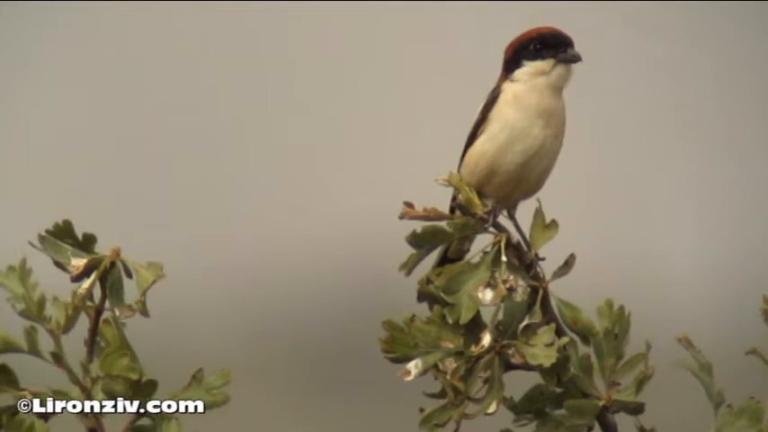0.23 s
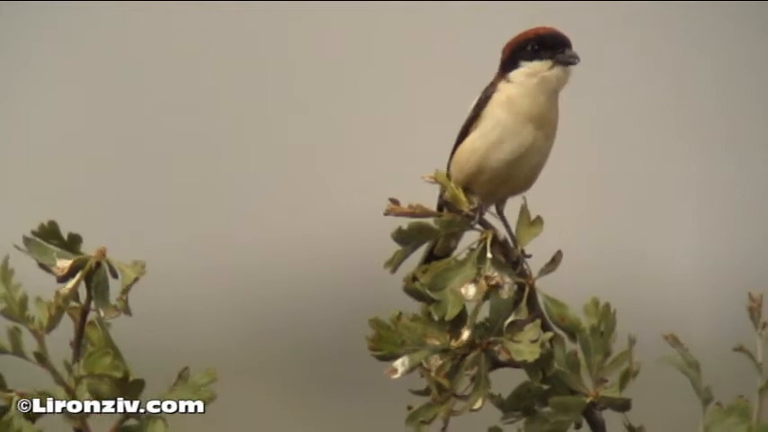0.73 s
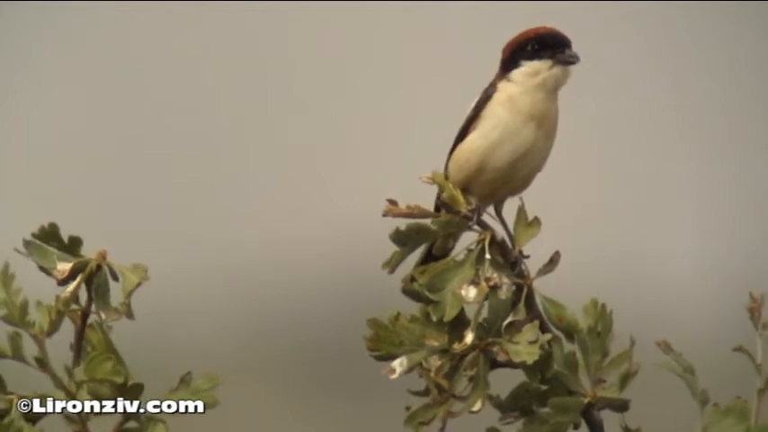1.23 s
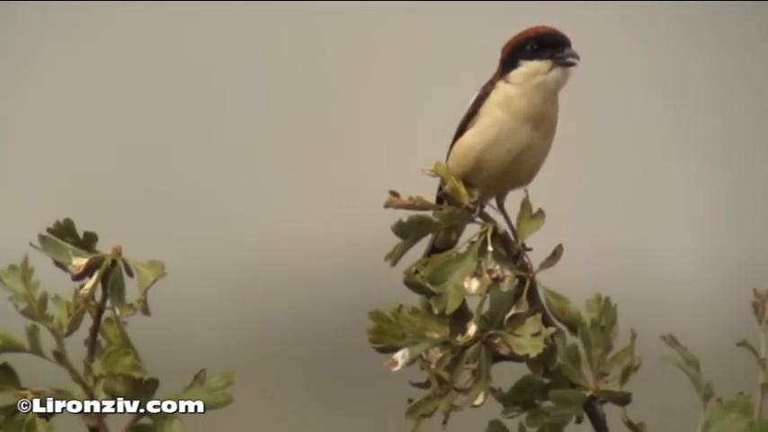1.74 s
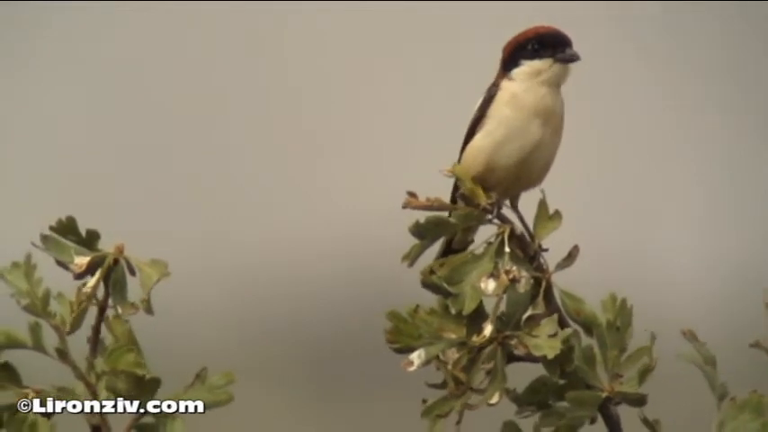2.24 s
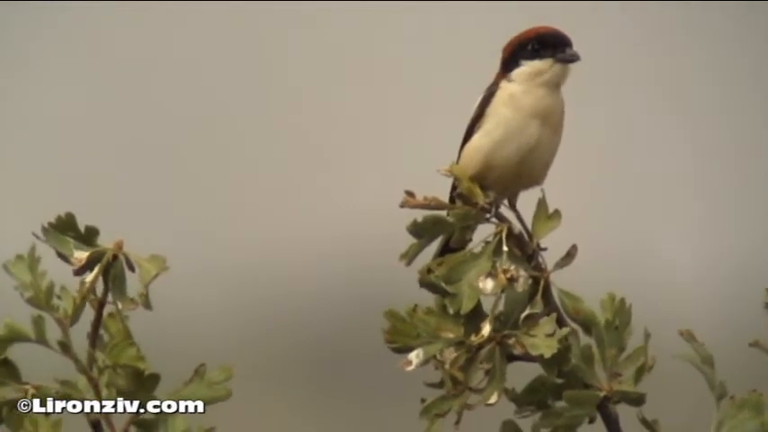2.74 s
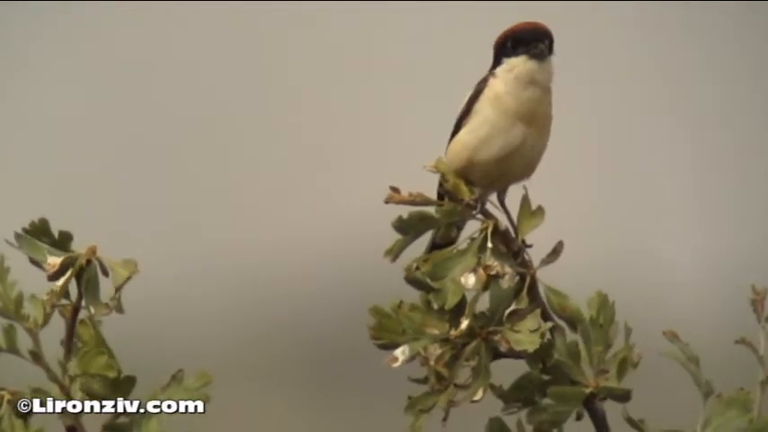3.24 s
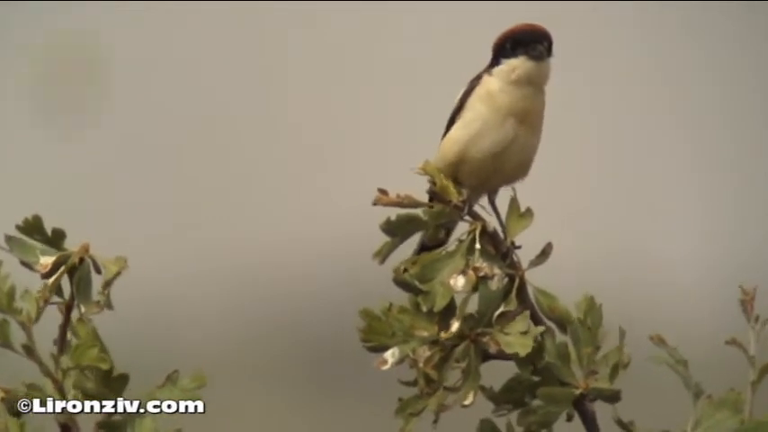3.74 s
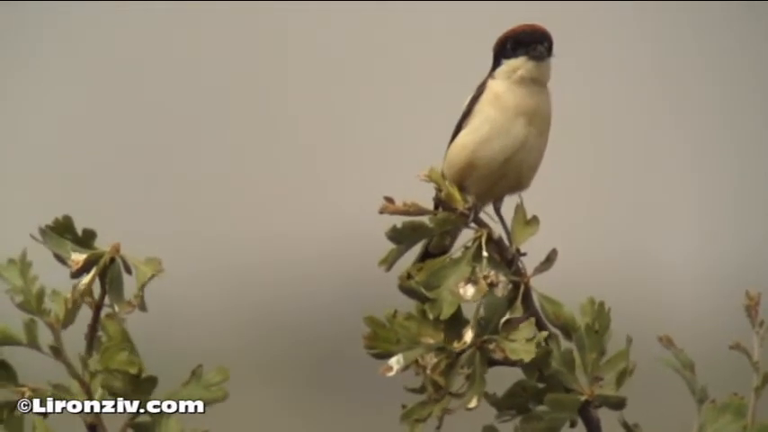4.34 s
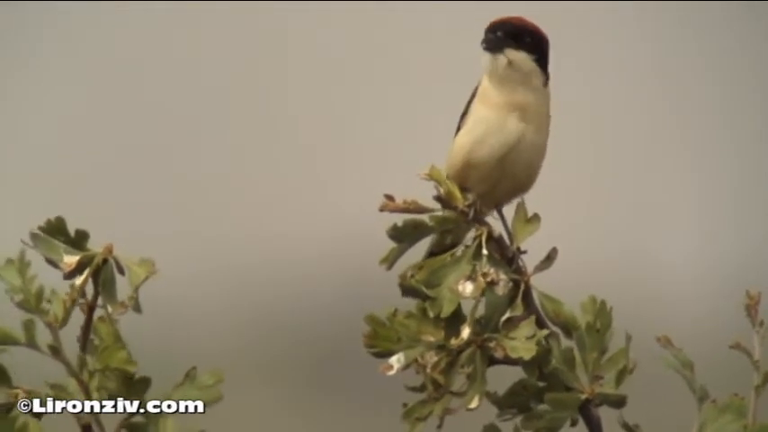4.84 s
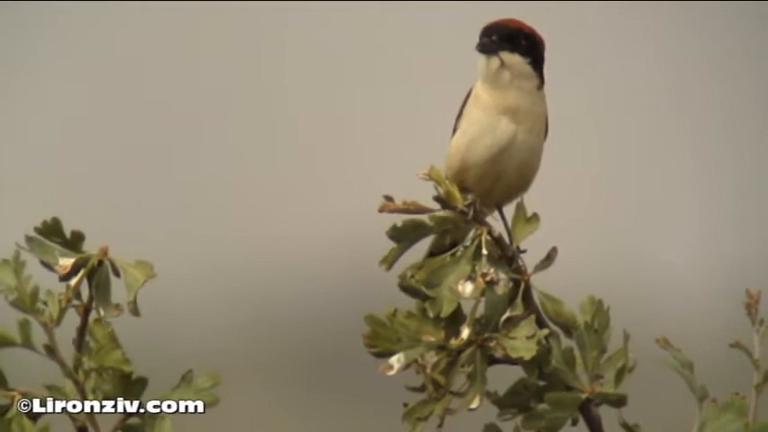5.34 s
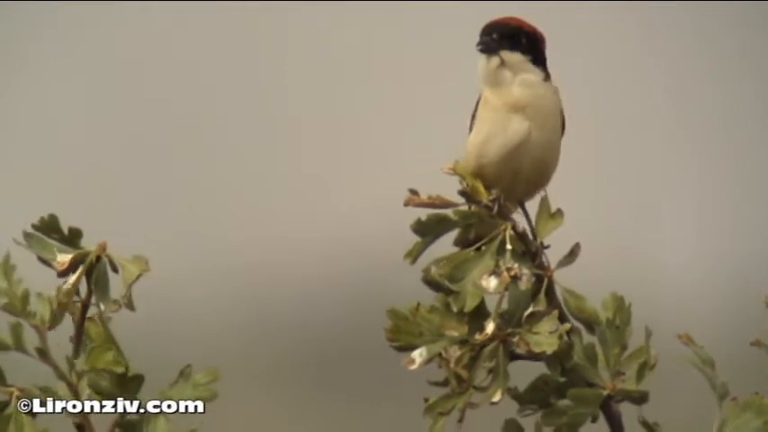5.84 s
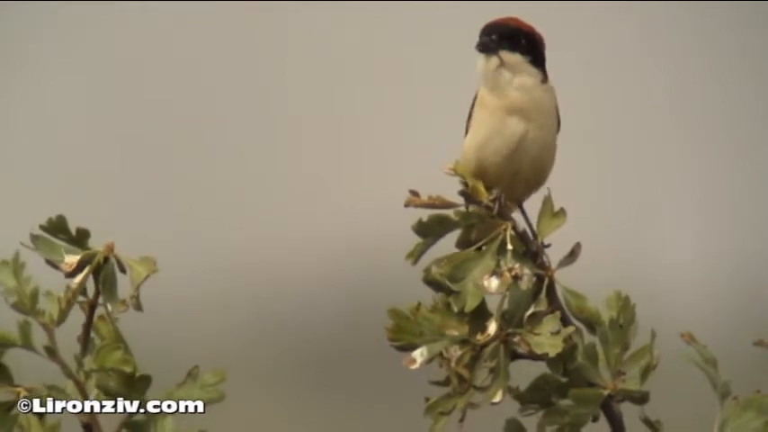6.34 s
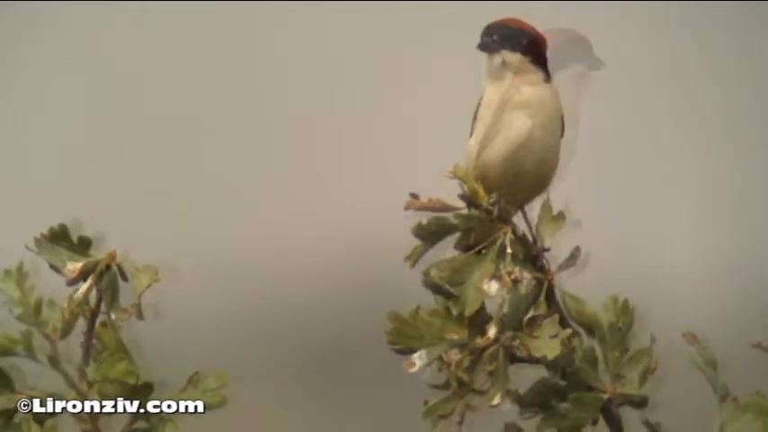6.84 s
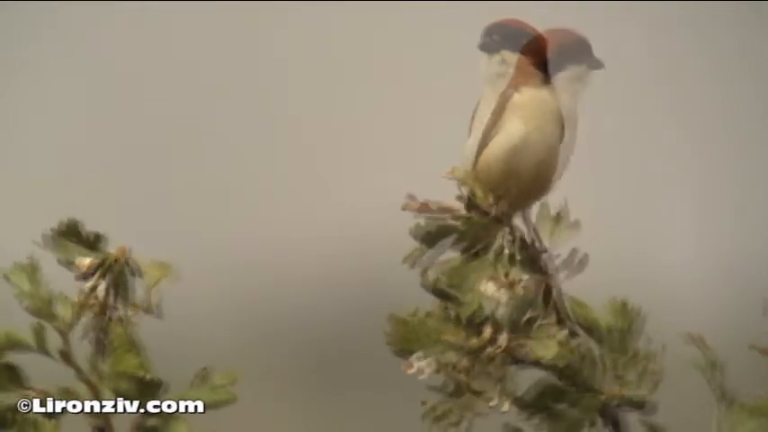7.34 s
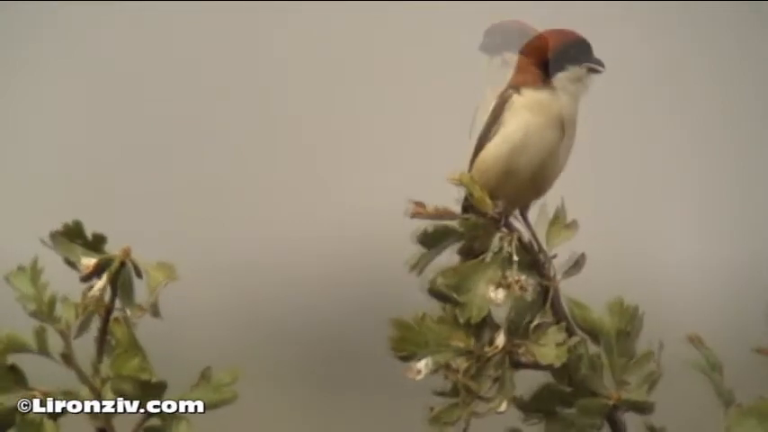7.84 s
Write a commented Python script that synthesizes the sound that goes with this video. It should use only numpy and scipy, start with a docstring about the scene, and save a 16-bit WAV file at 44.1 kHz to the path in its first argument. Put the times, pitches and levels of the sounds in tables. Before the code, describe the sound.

After a tiny moment of silence, soft outdoor hiss and faint low rumble begin. A small bird gives a low scratch at 0.2 s, then bright buzzy chirps from 0.4 to 0.9, the loudest notes, each diving and snapping upward. From 1.1 to 2.1 it mutters dry, scratchy chatter mixed with quick whistles, while dull low thumps bump underneath. A gap follows, with a soft thump at 2.8. From 2.9 to 3.5 come squeaky, sliding whistles, one rasp and a tiny trill. The bird then rests; low thumps cluster at 3.7 to 4.5, strongest near 4.0. Sparse rasps and whistles return at 4.9 to 5.2, then short, mixed scratches and drooping whistles from 5.4 to 6.5. Faint trills follow from 6.75, growing into a dense, thin, buzzing run from 7.3 to the end at 8. The sound is close and open, with only slight leafy echo.

```python
"""Shrike song over moving air

A shrike on a bush top sings quick phrases: gliding whistles, nearly pure tones broken by buzzes as a slower
vibration modulates them, and low scratchy chatter, pulse harmonics filtered by a throat resonance.
The foliage scatters a faint echo. Low thumps (decaying pressure swings) and an uneven rumble of shaped
noise, perhaps air buffeting the microphone, come and go over a soft outdoor hiss."""
import sys
import numpy as np
from scipy import signal
from scipy.fft import rfft, irfft, next_fast_len
from scipy.io import wavfile
from scipy.ndimage import map_coordinates

SR = 44100
rng = np.random.default_rng(int(sys.argv[2]) if len(sys.argv) > 2 else 0)


def master_out(mix):
    """Clip the mix to full scale and print it as 16-bit PCM to the path in sys.argv[1]."""
    frames = np.transpose(np.atleast_2d(mix))
    ceiling = np.clip(frames, -1, 1)
    pcm = np.round(ceiling * 32767).astype(np.int16)
    wavfile.write(sys.argv[1], SR, pcm)


N = 356416
TOP_HZ = 15700  # upper limit of the chatter's harmonics and of the whole sound

# Hooks, the loud opening notes: a dive, a climb to a crest, then a buzzing tail.
# Each row: start in seconds, dive in seconds, climb in seconds, tail in seconds, first pitch in Hz,
# lowest pitch in Hz, dive level in dB, dip level in dB, tail level at its peak in dB,
# octave overtone in dB before its fade and the beak's radiation.
HOOKS = [(0.536, 0.014, 0.014, 0.038, 5000, 2770, -34.5, -40.5, -29, -0.5),
         (.635, 0.012, 0.021, 0.014, 5210, 2840, -24, -40.5, -31, -1.5),
         (.742, 0.019, 0.017, 0.018, 4370, 2595, -35.5, -39.5, -31, 3),
         (0.872, 0.027, 0.0071, .014, 3460, 2900, -31.5, -43.5, -32.5, -1)]
HOOK_CREST_HZ, HOOK_TAIL_HZ = 4000, 3400
HOOK_SETTLE_S = 0.0029  # time constant of the step from crest to tail
# buzz depths; those of dive, crest and tail add to that of the dip
HOOK_DIVE_BUZZ, HOOK_DIP_BUZZ, HOOK_CREST_BUZZ, HOOK_TAIL_BUZZ = 0.28, 0.12, 0.42, 0.11
HOOK_BUZZ_HZ = 427
HOOK_TAIL_ARCH_DB = 5.5  # fall of level half a tail length away from the tail's peak
HOOK_TAIL_PEAK = 0.33  # where the tail peaks, as a share of its length
HOOK_ATTACK_S, HOOK_OVERTONE_FADE_DB = 0.0021, 16
HOOK_CREST_DIP_DB, HOOK_CREST_S = 2, 0.004

# Slurs: a sharp high accent, then a held whistle that sags and drops at the end.
# Each row: start in seconds, length in seconds, accent length in seconds, held pitch in Hz, sag in Hz per
# second, time constant of the drop in seconds, level in dB, accent level in dB,
# half the starting buzz depth, octave overtone at mid note in dB before the beak's radiation.
SLURS = [(5.691, 0.099, 0.012, 3730, 9030, 0.014, -43, -37.5, 0.06, -5.5),
         (5.877, 0.11, 0.0094, 2960, 2210, 0.0039, -44, -37, 0.07, -11),
         (6.261, 0.096, 0.0051, 3070, 3220, .005, -46, -41, 0.1, -2.5)]
SLUR_DROP_HZ = 520
SLUR_ACCENT_RISE = 0.17  # share of the held pitch
SLUR_BUZZ_HZ, SLUR_CLEARS_S = 700, 0.064  # buzz rate and time constant of its decay
SLUR_SCOOP_HZ, SLUR_SCOOP_S = 700, 0.0019  # pitch deficit at the onset and its time constant

# Peaked whistles: the pitch sweeps up to a point and falls away.
# Each row: start in seconds, rise in seconds, fall in seconds, first pitch in Hz, top pitch in Hz,
# last pitch in Hz, starting level in dB, buzz depth before a factor of 0.7,
# octave overtone in dB before the beak's radiation.
PEAKED = [(3.347, 0.0503, 0.02, 2550, 4760, 3800, -43, 0.31, -14),
          (4.968, 0.031, 0.01, 2665, 4310, 3670, -42, 0.5, -27),
          (5.596, 0.025, 0.017, 1886, 3770, 2720, -41.5, 0.4, -23),
          (7.423, 0.029, 0.012, 1860, 4270, 3100, -46, 0.24, -24),
          (7.824, .013, .018, 3950, 6360, 3800, -59, .1, -20)]
PEAKED_BUZZ_HZ, PEAKED_CURVE = 757, 1.4  # buzz rate and exponent of both sweeps

# Trills: the pitch swings up and down.
# Each row: start in seconds, length in seconds, first pitch in Hz, last pitch in Hz, swings per second,
# level in dB.
TRILLS = [(3.42, 0.064, 4120, 3410, 40, -37.5), (6.752, .043, 2980, 3080, 64, -54.5),
          (6.909, 0.043, 2990, 3010, 70, -50), (7.105, 0.055, 2940, 2940, 65, -47)]
TRILL_SWING_HZ, TRILL_THROB_DB = 306, 2.5
TRILL_BUZZ, TRILL_BUZZ_HZ, TRILL_OCTAVE_DB = 0.17, 555, -17

# Glides: one curved sweep each; overlapping rows sound together, as second voices, overtone strands
# or buzz sidebands.
# Each row: start in seconds, length in seconds, first pitch in Hz, middle pitch in Hz, last pitch in Hz,
# level in dB, swell over the note in dB, nominal buzz depth (less in the middle, more at the ends),
# buzz rate in Hz, octave overtone in dB before the beak's radiation.
GLIDES = [(0.425, 0.044, 5160, 4450, 4470, -45.5, -1, 0.77, 290, -10),
          (0.469, 0.022, 4200, 4030, 3250, -51, -2, .25, 291, -14),
          (1.779, 0.026, 4230, 3450, 2950, -40.5, -8, 0.43, 594, -20),
          (1.851, .013, 3450, 3720, 4130, -37.5, 1, 0.33, 600, -20),
          (1.864, 0.047, 2680, 3000, 2460, -40, 1.5, 0.2, 640, -5.5),
          (1.918, 0.047, 2340, 2130, 1970, -53, -2, 0.26, 640, -6.5),
          (2.894, 0.0038, 5370, 5200, 4900, -41.5, -6, 1, 794, -3),
          (2.902, 0.02, 4450, 4150, 4040, -40, -9, 0.36, 794, -2),
          (2.916, 0.019, 3720, 3750, 3520, -41.5, -3, 0.19, 794, 7.5),
          (2.938, 0.019, 2500, 2580, 2680, -50, 19, 0.25, 794, -1),
          (2.961, 0.015, 2240, 2050, 1910, -59, -2, .2, 794, -4),
          (3.236, 0.017, 3900, 3930, 4000, -39.5, 3, 0.12, 696, -6),
          (3.248, 0.033, 4230, 4120, 3860, -34, 1, 0.03, 700, -13),
          (3.288, 0.036, 3540, 3310, 3080, -40, -6, 0.25, 700, -14),
          (3.325, .01, 3080, 2750, 2460, -36, -1, 0, 695, -25),
          (3.289, 0.032, 2910, 2700, 2570, -46, -6, 0.15, 685, -14),
          (3.34, 0.023, 3700, 4100, 4500, -52, 3, 0.3, 696, -24),
          (3.399, .012, 3000, 3300, 3370, -48, 5, 0.1, 700, -22),
          (3.429, .012, 3420, 3330, 3270, -45, 0, 0, 700, -22),
          (3.488, 0.011, 3180, 2850, 2600, -46, -10, 0, 670, -9),
          (5.161, .023, 4300, 3540, 3020, -36, 3.5, 0.11, 740, -26),
          (5.182, 0.037, 2810, 2550, 2300, -38.5, -17, 0.17, 737, -17),
          (5.582, 0.023, 2580, 3150, 4160, -47, -4, 0.36, 930, -22),
          (5.634, .016, 2750, 2770, 2450, -40, -15, 0.1, 840, -34),
          (5.702, .039, 4540, 4720, 4050, -46.5, 5, .02, 600, -18),
          (6.06, 0.021, 3540, 3520, 3280, -46, -11, 0.45, 400, -12),
          (6.31, .052, 4500, 4180, 3650, -54, 2, 0.1, 710, -24),
          (6.421, 0.014, 3330, 3550, 4100, -49, 3, 0.6, 403, -11),
          (7.264, 0.022, 4170, 3600, 3380, -51, 1, 0.24, 640, -12),
          (7.311, .043, 2730, 3050, 3340, -53.5, 0, 0.63, 322, -24),
          (7.332, 0.033, 3850, 3850, 4100, -49.5, -3, 0.4, 323, -24),
          (7.376, 0.06, 1550, 1640, 1750, -58, 2, 0, 1610, -28),
          (7.472, 0.018, 3360, 3430, 2450, -38, 3, 0.02, 1580, -33),
          (7.481, 0.033, 4200, 3860, 3650, -50, -6, .1, 805, -24),
          (7.491, 0.031, 2480, 2150, 1900, -51.5, -10, 0.03, 810, -24),
          (7.492, 0.022, 3120, 2870, 2700, -48, -2, 0.2, 800, -24),
          (7.581, .016, 4440, 4100, 3870, -47.5, 2, 0.17, 593, -11),
          (7.618, 0.052, 2840, 3500, 3780, -47, 5, 0.45, 265, -20),
          (7.8, .008, 3950, 3620, 3300, -45, 2, .9, 545, -14),
          (7.81, 0.029, 3750, 3670, 3700, -41, 1, 0.16, 1030, -14),
          (7.805, 0.056, 3250, 3130, 3360, -46.5, 6, 0.16, 500, -22),
          (7.869, 0.029, 4570, 4280, 4070, -45, -1, 0.33, 410, -9),
          (7.923, 0.065, 3030, 3400, 3860, -40, 1, 0.43, 243, -23),
          (7.932, 0.036, 4700, 4720, 4670, -53, 0, .5, 235, -24),
          (7.988, .045, 3680, 3450, 2720, -55, -5, .45, 234, -20)]
NOTE_ARCH_DB = 4.5  # fall of level to both ends of trills and glides, to the last end of peaked whistles
NOTE_WOBBLE_HZ, NOTE_WOBBLE_RATE = 265, 170.7  # pitch unsteadiness at full buzz; turns a second

# Rasps: short low strokes whose pitch and level arch; they run together into chatter.
# Each row: start in seconds, length in seconds, middle pitch in Hz, upward slide over the stroke as a share
# of that pitch, sag of its ends as a share of that pitch, level in dB, rasp from 0 to 1 before the least
# rasp applies, throat resonance in Hz.
RASPS = [(0.177, .042, 1600, -0.13, 0.34, -48.5, 0.42, 4600), (.219, .015, 1390, .4, 0.026, -50, .2, 4370),
         (0.234, 0.027, 1126, -.25, 0.097, -41.5, 0.54, 3760),
         (.614, 0.019, 1830, 0.47, 0.0049, -46, 0.16, 3870),
         (1.068, 0.031, 1366, 0.11, 0.0093, -53, 0.12, 3330),
         (1.089, .022, 1660, -0.53, 0.031, -47, 0.52, 3330),
         (1.118, 0.044, 1117, -.05, 0.069, -47, 0.75, 3300), (1.294, 0.026, 1050, 0.17, 0, -58, 0.21, 3430),
         (1.313, .022, 1390, -0.1, 0.062, -50, .5, 3460),
         (1.338, 0.019, 1665, -0.56, 0.012, -47, .45, 3350),
         (1.358, 0.035, 1080, -0.1, 0.12, -47.5, 0.32, 3400),
         (1.517, 0.04, 1100, 0, 0.058, -58, 0.65, 3600), (1.561, 0.055, 1007, -.1, 0.12, -50.5, 0.5, 3550),
         (1.71, 0.025, 1344, -0.25, 0.065, -52, .15, 3840),
         (1.739, .028, 1604, -0.66, 0.011, -43, 0.47, 4260),
         (1.771, .014, 2050, 0.145, .2, -40, 0.46, 4000), (1.798, 0.032, 1063, -.12, 0, -49, 0.78, 3780),
         (1.834, 0.019, 1424, -0.0035, 0.025, -39.5, 0.19, 3820),
         (1.854, .026, 1438, .12, .05, -41, .9, 3960), (2.008, 0.045, 987, 0.015, 0.07, -48, 0.64, 3560),
         (2.057, 0.023, 992, -0.039, 0.088, -45.5, 0.9, 3440),
         (3.016, 0.051, 1383, -0.031, 0, -43.5, 0.86, 4670), (4.88, 0.046, 885, 0, 0.11, -50, 0.32, 3300),
         (4.938, .038, 930, -0.067, .1, -46.5, 0.64, 3420),
         (5.426, 0.023, 892, -0.074, 0.16, -45.5, 0.83, 3540),
         (5.482, 0.027, 1017, -0.16, 0.13, -42, 0.56, 3420),
         (5.881, .095, 984, 0.072, 0.14, -55, 0.81, 3770),
         (6.119, 0.0177, 906, -0.11, 0.14, -44.5, 0.92, 3340),
         (6.261, 0.053, 1010, -0.098, .04, -50.5, 0.82, 4160),
         (6.468, 0.019, 860, -0.19, 0.14, -42.5, 0.73, 3480),
         (6.511, 0.011, 1030, 0.046, 0.13, -42.5, 0.66, 3650),
         (7.085, 0.014, 1010, -0.23, 0, -56.5, 0.82, 3500)]
RASP_ARCH_DB = 4.5  # how far the ends of a stroke lie under its middle
RASP_LEAST = 0.3

# Low thumps. Each row: time of the peak in seconds, peak level in dB, pitch at the peak in Hz,
# time in seconds from the peak to about 0.42 of its height.
THUMPS = [(1.181, -33, 74, 0.027), (1.237, -28, 40.3, 0.01), (1.488, -23, 62, 0.0078),
          (1.847, -31, 80.4, 0.0049), (1.972, -28, 58.3, 0.011), (2.815, -33, 133, 0.0066),
          (2.827, -29, 54.6, 0.0073), (3.734, -32, 60, 0.0046), (3.968, -26.5, 203, 0.0032),
          (3.975, -17.5, 103.6, 0.011), (3.99, -19, 48, 0.0082), (4.216, -36.5, 45.3, 0.014),
          (4.34, -30, 124, 0.0053), (4.356, -30.5, 60.3, 0.012), (4.419, -21.5, 119.6, 0.0044),
          (4.43, -27.5, 168, 0.0032), (4.462, -35, 139, 0.0062), (4.45, -23, 43.2, 0.017)]
THUMP_CHURN_DB, THUMP_CHURN_S = -21.5, 0.03  # rough air at each thump: level re its peak, duration
# Spectrum of the rough air. Each row: frequency in Hz, relative level in dB.
THUMP_CHURN_COLOUR = [(15, -20), (45, -0.5), (120, 4), (200, -9.5), (300, -24), (600, -54)]

# Course of the low rumble. Each row: time in seconds, level in dB before the common lift.
RUMBLE = [(0.0, -66), (0.13, -55.5), (0.65, -53), (.85, -46), (1.2, -43), (1.65, -45.5), (1.98, -45.5),
          (2.2, -53.5), (3.24, -48), (3.5, -52), (3.9, -43.5), (4.2, -46.5), (4.5, -42), (4.65, -51.5),
          (5.6, -51.5), (5.9, -50), (6.4, -53), (8.08, -52.5)]
# Spectrum of the rumble. Each row: frequency in Hz, relative level in dB.
RUMBLE_COLOUR = [(12, -58), (20, -1), (49, 2.5), (123, -9), (222, -23), (400, -30), (520, -29), (880, -120)]
# Course of the outdoor hiss. Each row: time in seconds, mean level in dB.
HISS = [(0, -50.5), (.5, -53), (.8, -50), (1.2, -54.5), (1.8, -51.5), (2.3, -54), (3.6, -53), (4.1, -53.5),
        (4.7, -54), (6.6, -53.5), (7.2, -57), (8.08, -54.5)]
# Spectrum of the hiss. Each row: frequency in Hz, relative level in dB.
HISS_COLOUR = [(120, -3.5), (200, -2.5), (327, -7), (407, -7), (677, -9.5), (812, -10), (1150, -12),
               (2330, -16.5), (2850, -18), (4920, -21.5), (8980, -27.5), (15500, -36)]


def whistles(third_db=-8):
    """A nearly pure syrinx tone is frequency- and amplitude-modulated into a buzz by a slower membrane."""
    out = np.zeros(N)
    swing_hz, scratch_hz = 480, 260  # pitch shaken by the buzz and by fast random motion
    throb, lurch, buzz_jitter, flutter_db = 1.5, 0.35, 0.07, 1.6
    # overtone radiation (Hz, dB)
    beak = [(3200, 25), (4400, 9.5), (5400, -3), (6200, -1.0), (6900, -13.5), (7800, -18.5),
            (10000, -14.5), (14000, -40)]
    notes = [*hooks(), *slurs(), *peaked(), *trills(), *glides()]
    for t, hz, gain, depth, buzz_hz, octave_db in notes:
        depth = np.clip(depth, 0, 1)
        buzz = turn(buzz_hz * (1 + buzz_jitter * wander(t, 294.0)))
        # the faster the buzz, the more the pitch lurches
        shake_hz = swing_hz * np.sin(buzz) + lurch * buzz_hz * wander(t, 202.5)
        shake_hz = shake_hz + scratch_hz * wander(t, 898)
        wobble_hz = NOTE_WOBBLE_HZ * wander(t, NOTE_WOBBLE_RATE)
        phase = turn(hz + depth * (shake_hz + wobble_hz))
        # the Bessel function keeps the pulsing at rms 1
        pulsing = np.exp(throb * depth * np.cos(buzz)) / np.sqrt(np.i0(2 * throb * depth))
        # overtones are strongest while the tone is steady
        upper = sum(np.sin(k * phase) * (k * hz < SR / 2) for k in range(3, 6))
        overtones = np.exp(-depth) * shaped(np.sin(2 * phase) + undb(third_db) * upper, beak)
        tone = np.sin(phase) + undb(octave_db) * overtones
        flutter = undb(flutter_db * wander(t, 366))
        add(out, t, np.sqrt(2) * tone * gain * pulsing * flutter)
    return out


def hooks():
    """Modulation is least at the bottom of the dive, greatest at the crest, and a buzz swells after it."""
    for (s, dive_s, climb_s, tail_s, first_hz, low_hz,
         dive_db, dip_db, tail_db, octave_db) in HOOKS:
        t, _, gate = span(s, dive_s + climb_s + tail_s)
        dip, crest = s + dive_s, s + dive_s + climb_s
        dive = np.clip((dip - t) / dive_s, 0, 1) ** 2
        climb = np.clip((t - dip) / climb_s, 0, 1) ** 2
        tail = np.clip((t - crest) / tail_s, 0, 1)
        settled = 1 - np.exp(-np.maximum(t - crest, 0) / HOOK_SETTLE_S)

        hz = low_hz + (first_hz - low_hz) * dive + (HOOK_CREST_HZ - low_hz) * climb
        hz = hz + (HOOK_TAIL_HZ - HOOK_CREST_HZ) * settled
        swell_db = tail_db - HOOK_TAIL_ARCH_DB * (2 * (tail - HOOK_TAIL_PEAK)) ** 2
        db = dip_db + (dive_db - dip_db) * np.sqrt(dive) + (swell_db - dip_db) * climb
        db = db - HOOK_CREST_DIP_DB * np.exp(-((t - crest) / HOOK_CREST_S) ** 2)
        depth = HOOK_DIP_BUZZ + HOOK_DIVE_BUZZ * dive
        depth = depth + HOOK_CREST_BUZZ * climb ** 2 * (1 - settled) + HOOK_TAIL_BUZZ * settled
        attack = np.clip((t - s) / HOOK_ATTACK_S, 0, 1)
        overtone_db = octave_db - HOOK_OVERTONE_FADE_DB * (dive + climb)
        yield t, hz, gate * attack * undb(db), depth, HOOK_BUZZ_HZ, overtone_db


def slurs(release_db=14, swell_db=3, brighten_db=6):
    """After a high accent the tone steps down, its modulation decays, and it fades as the pitch drops."""
    for (s, length_s, accent_s, pitch_hz, sag_hz_per_s, drop_s,
         db, accent_db, depth, octave_db) in SLURS:
        t, u, gate = span(s, length_s)
        accent = 1 / (1 + np.exp((t - s - accent_s) / 0.00061))
        drop = np.exp((u - 1) * length_s / drop_s)
        hz = pitch_hz * (1 + SLUR_ACCENT_RISE * accent) - sag_hz_per_s * (t - s)
        hz = hz - SLUR_DROP_HZ * drop - SLUR_SCOOP_HZ * np.exp((t[0] - t) / SLUR_SCOOP_S)
        held_db = db + swell_db * (u - .5)
        level = accent * accent_db + (1 - accent) * held_db - release_db * drop ** 2
        buzz_depth = 2 * depth * np.exp(-u * length_s / SLUR_CLEARS_S)
        yield t, hz, gate * undb(level), buzz_depth, SLUR_BUZZ_HZ, octave_db + brighten_db * (u - .5)


def peaked():
    """The pitch climbs as a power law whose modulation vanishes at the top, then falls by the same law."""
    for s, rise_s, fall_s, first_hz, top_hz, last_hz, db, depth, octave_db in PEAKED:
        t, u, gate = span(s, rise_s + fall_s)
        rise = np.clip((t - s) / rise_s, 0, 1) ** PEAKED_CURVE
        fall = np.clip((t - s - rise_s) / fall_s, 0, 1) ** PEAKED_CURVE
        hz = first_hz + (top_hz - first_hz) * rise + (last_hz - top_hz) * fall
        buzz_depth = 0.7 * depth * (1 - rise ** 2)
        yield t, hz, gate * undb(db - NOTE_ARCH_DB * u ** 2), buzz_depth, PEAKED_BUZZ_HZ, octave_db


def trills():
    """Sinusoidal frequency modulation with level in phase: each upward swing is louder than its trough."""
    for s, length_s, first_hz, last_hz, rate, db in TRILLS:
        t, u, gate = span(s, length_s)
        swing = -np.cos(2 * np.pi * rate * (t - s))
        hz = first_hz + (last_hz - first_hz) * u + TRILL_SWING_HZ * swing
        level = db + TRILL_THROB_DB * swing - NOTE_ARCH_DB * ends(u)
        yield t, hz, gate * undb(level), TRILL_BUZZ, TRILL_BUZZ_HZ, TRILL_OCTAVE_DB


def glides(edge_buzz=0.82):
    """The pitch follows a parabola through three points; level arches and modulation is least mid note."""
    for (s, length_s, first_hz, middle_hz, last_hz,
         db, swell_db, depth, buzz_hz, octave_db) in GLIDES:
        t, u, gate = span(s, length_s)
        bend_hz = (first_hz + last_hz) / 2 - middle_hz
        hz = middle_hz + (last_hz - first_hz) * (u - .5) + bend_hz * ends(u)
        level = db + swell_db * (u - .5) - NOTE_ARCH_DB * ends(u)
        buzz_depth = depth * (1 + edge_buzz * (ends(u) - .5))
        yield t, hz, gate * undb(level), buzz_depth, buzz_hz, octave_db


def chatter(shimmer_db=4.0, smear_hz=480):
    """Source and filter: the harmonics of low, uneven syrinx pulses slide through the throat resonance."""
    out = np.zeros(N)
    lurch, smear = 0.1, 1.8  # at full rasp: share of the pitch; radians of phase
    # (multiple of the resonance, dB)
    throat = [(.3, -13.5), (.55, -3), (.78, 4), (1, 4), (1.2, 6), (1.36, -8), (1.8, -16.5), (3, -42)]
    for t, hz, gain, rasp, throat_hz in rasps():
        phase = turn(hz * (1 + lurch * rasp * wander(t, 154.7)))
        pulses = np.zeros(len(t))
        # as the rasp grows the vibration turns chaotic and each harmonic smears on its own
        for k in range(1, 13):
            harmonic = np.cos(k * phase + smear * rasp * wander(t, smear_hz))
            pulses += harmonic * (k * hz < TOP_HZ)
        pulses = pulses * undb(shimmer_db * rasp * wander(t, 575))
        resonance = [(m * throat_hz, db) for m, db in throat]
        add(out, t, gain * unit(shaped(pulses, resonance)))
    return out


def rasps():
    """Pitch and level arch together over each stroke, on top of a steady slide of pitch."""
    for s, length_s, pitch_hz, slide, sag, db, rasp, throat_hz in RASPS:
        t, u, gate = span(s, length_s)
        hz = pitch_hz * (1 + slide * (u - .5) - sag * ends(u))
        gain = gate * undb(db - RASP_ARCH_DB * ends(u))
        yield t, hz, gain, np.clip(rasp, RASP_LEAST, 1), throat_hz


def foliage(song, echo_db=-23, t60_s=0.35):
    """Diffuse scattering from leaves and ground: convolution with exponentially decaying noise."""
    t = np.arange(SR // 2) / SR
    response = rng.standard_normal(len(t)) * np.exp(-np.log(1000) * t / t60_s)  # 60 dB down at t60_s
    return undb(echo_db) * signal.fftconvolve(song, response / np.linalg.norm(response))[:N]


def thumps(sag=0.22):
    """Each thump is a brief pressure oscillation that slows as it dies, with a short rough rumble."""
    out, churn_power = np.zeros(N), np.zeros(N)
    age = np.arange(-SR // 10, SR // 10) / SR  # seconds from the peak
    for s, db, hz, half_s in THUMPS:
        phase = turn(hz * (1 - sag * np.tanh(age / half_s)))
        swing = np.cos(phase - phase[len(age) // 2])
        add(out, s + age, undb(db) / np.cosh(1.51 * age / half_s) * swing)
        churn_gain = undb(db + THUMP_CHURN_DB) / np.cosh(2 * age / THUMP_CHURN_S - .5)
        add(churn_power, s + age, churn_gain ** 2)
    return out + np.sqrt(churn_power) * noise(THUMP_CHURN_COLOUR)


def air(rumble_db=1, surge_db=2, waver_db=0.73):
    """Spectrally shaped noise, slowly modulated in level: a surging low rumble under a smooth hiss."""
    t = np.arange(N) / SR
    rumble = noise(RUMBLE_COLOUR) * undb(curve(RUMBLE) + rumble_db + surge_db * wander(t, 12))
    hiss = noise(HISS_COLOUR) * undb(curve(HISS) + waver_db * wander(t, 11))
    return rumble + hiss


def span(start_s, length_s, edge_s=.002):
    """A note's time axis, its progress from 0 to 1, and a sine-squared gate that softens its edges."""
    t = np.arange(int((start_s - edge_s) * SR), int((start_s + length_s + edge_s) * SR)) / SR
    fade = np.clip(np.minimum(t - t[0], t[-1] - t) / edge_s, 0, 1)
    progress = np.clip((t - start_s) / length_s, 0, 1)
    return t, progress, np.sin(fade * np.pi / 2) ** 2


def ends(u):
    """A parabola: 0 in the middle of a note, 1 at both ends."""
    return (2 * u - 1) ** 2


def turn(hz):
    """Phase is the running integral of frequency."""
    return 2 * np.pi * np.cumsum(hz) / SR


def wander(t, rate):
    """Interpolated random values: smooth motion with about rate turns a second and a spread near 1."""
    place = (t - t[0]) * rate
    return map_coordinates(rng.standard_normal(4096), [place], order=3, mode="wrap")


def add(out, t, sound):
    """Superposition: mix a sound in at its own time."""
    start = int(round(t[0] * SR))
    out[start:start + len(sound)] += sound[:max(0, N - start)]


def undb(db):
    """Decibels to amplitude gain."""
    return 10 ** (np.asarray(db) / 20)


def unit(x):
    """Scale to rms 1."""
    return x / np.sqrt(np.mean(x ** 2))


def gain_at(hz, points):
    """Gain of a (Hz, dB) response, interpolated over log frequency."""
    f, db = np.transpose(points)
    return undb(np.interp(np.log(np.maximum(hz, 1)), np.log(f), db))


def shaped(x, points):
    """Linear filtering: the spectrum is multiplied by a (Hz, dB) response."""
    size = next_fast_len(len(x) + 512)
    response = gain_at(np.fft.rfftfreq(size, 1 / SR), points)
    return irfft(rfft(x, size) * response, size)[:len(x)]


def noise(points):
    """White noise filtered to a colour and scaled to rms 1."""
    return unit(shaped(rng.standard_normal(N), points))


def curve(rows):
    """A (s, value) curve, interpolated linearly at every sample."""
    return np.interp(np.arange(N) / SR, *np.transpose(rows))


def scene():
    """Superposition of the bird, its echo in the bush and the moving air."""
    song = whistles() + chatter()
    return (song + foliage(song) + thumps() + air())[None]


def record(dry):
    """A gate opens after a moment of silence; a steep elliptic low-pass limits the band."""
    opening = curve([(.07, 0), (.075, 1)])
    lowpass = signal.ellip(10, .1, 70, TOP_HZ, fs=SR, output="sos")  # 0.1 dB ripple, 70 dB stop band
    return signal.sosfilt(lowpass, dry * opening)


dry = scene()
out = record(dry)
master_out(out)
```